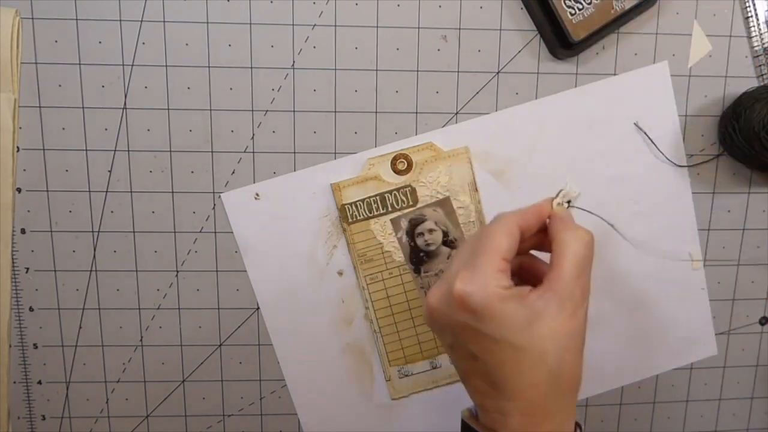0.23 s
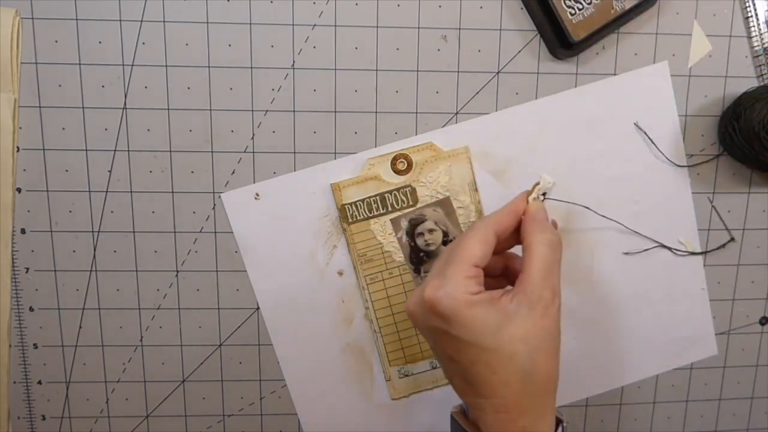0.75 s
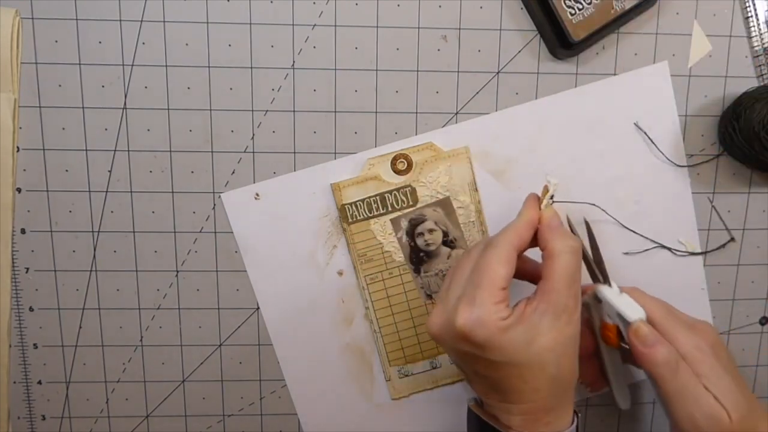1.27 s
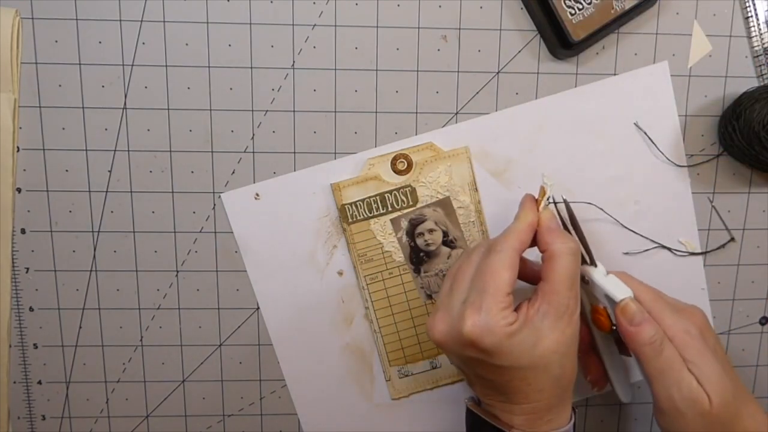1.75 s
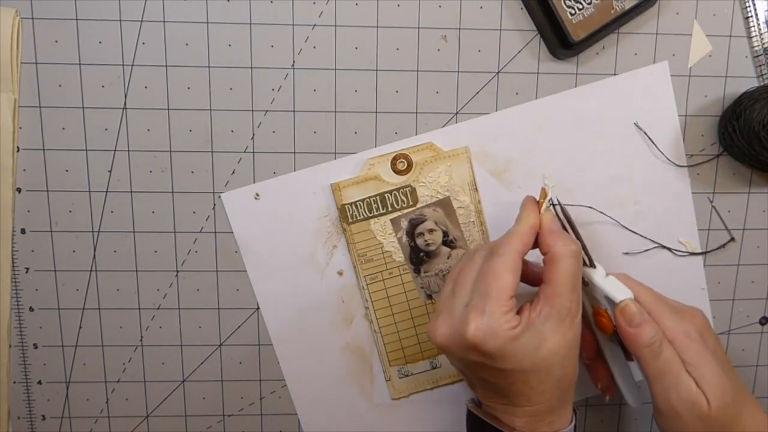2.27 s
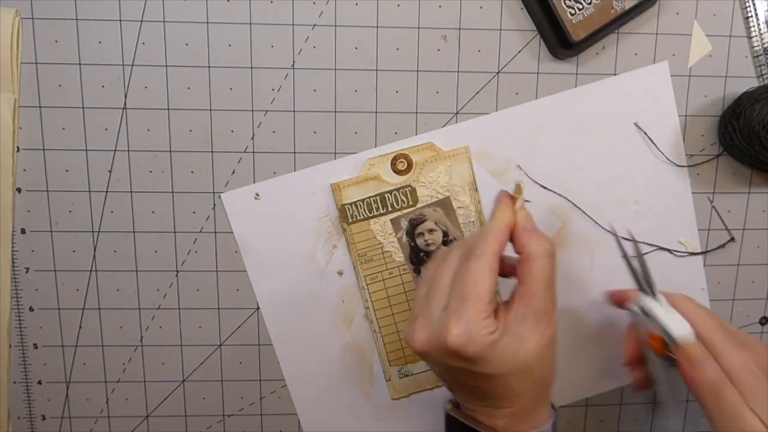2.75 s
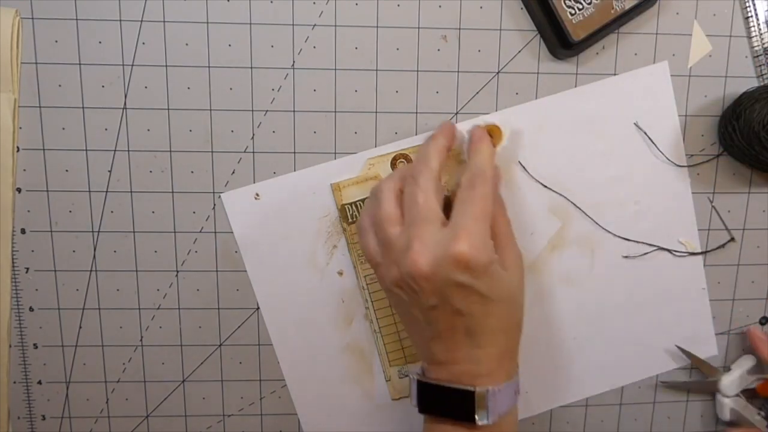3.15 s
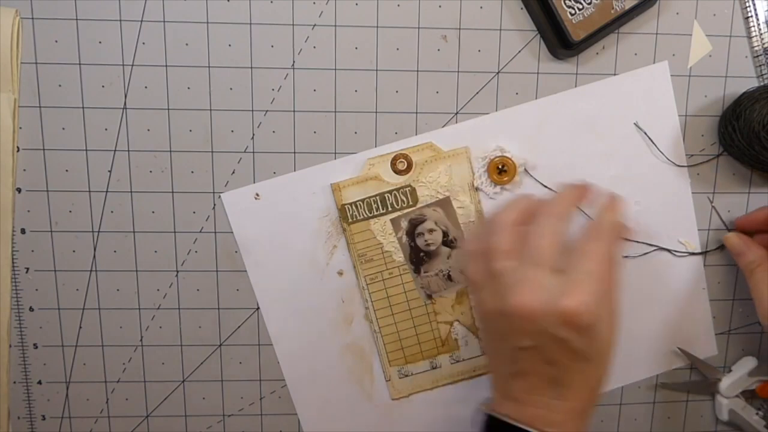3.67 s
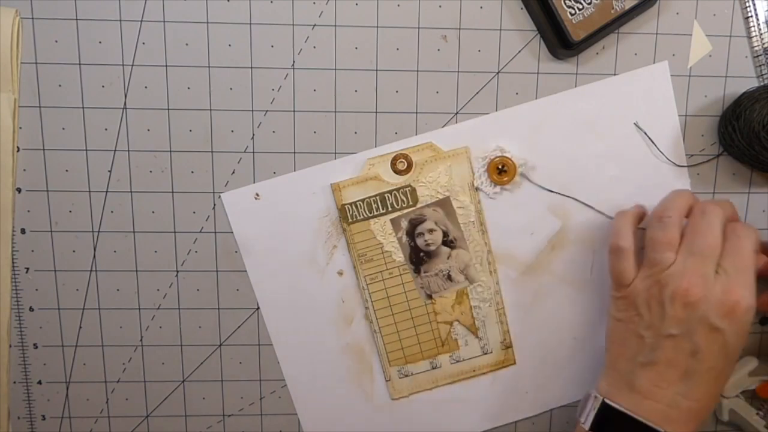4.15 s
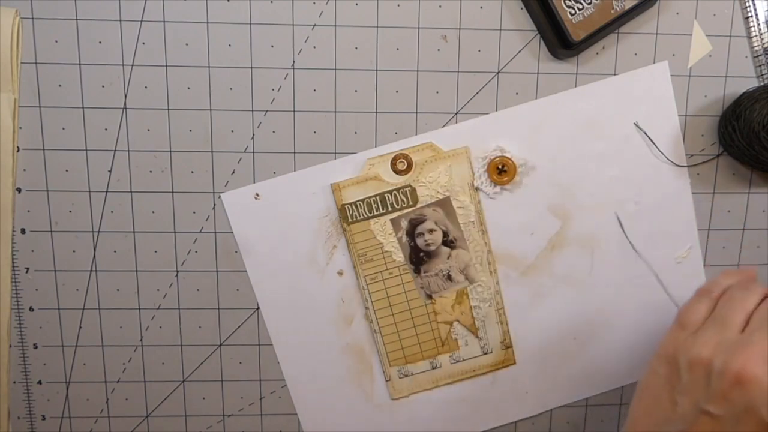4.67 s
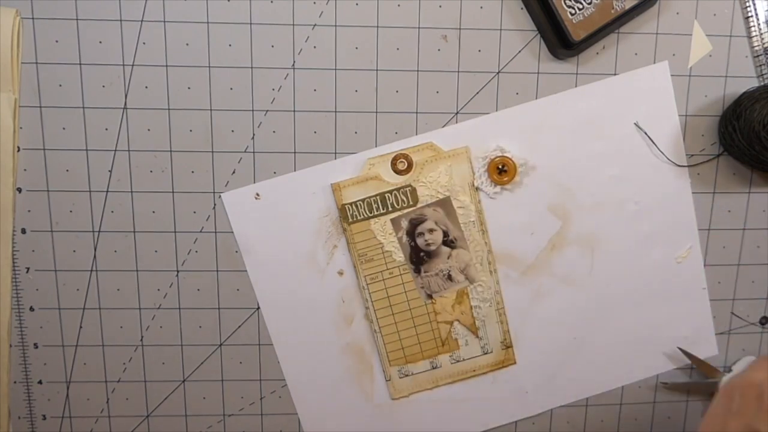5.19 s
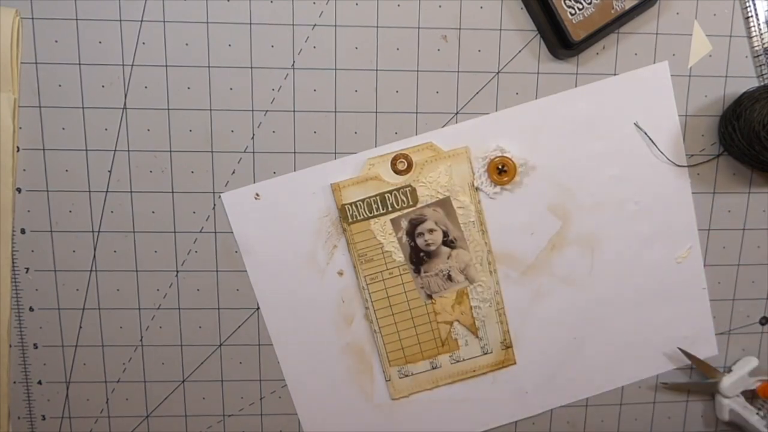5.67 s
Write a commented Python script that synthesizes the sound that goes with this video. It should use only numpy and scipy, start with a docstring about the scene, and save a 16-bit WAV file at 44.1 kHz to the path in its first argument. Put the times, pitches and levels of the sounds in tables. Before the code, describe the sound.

Small plastic-handled scissors are dragged and picked up from a mat with thin metallic ticks and a short rasp. After a quiet pause they cut thread with one brief bright snip, then land with a sharp, woody clack and quick bounce, the loudest moment. Faint taps and tiny fingertip rustles come after. Close microphones, small dry room, low distant fan rush and hum throughout.

```python
"""Small spring scissors at a craft table in a quiet room, heard by two microphone ports above the mat.
Fingers brush and squeak; the scissors are dragged and lifted off the mat, snip a thread, drop back with a clack
and a bounce, and are nudged again. Impacts excite damped modes of blades, plastic handles and table top, with
filtered noise for rattle; drags excite modes by random slips, and the snip by a short burst of noise.
A fan rushes and hums far off throughout, with microphone hiss: shaped noise and wavering sine tones."""
import sys
import numpy as np
from scipy import signal
from scipy.fft import rfft, irfft, next_fast_len
from scipy.io import wavfile
from scipy.ndimage import map_coordinates

SR = 44100
rng = np.random.default_rng(int(sys.argv[2]) if len(sys.argv) > 2 else 0)


def unload_audio(sound):
    """Save the sound as a 16-bit wav file, at the path given as the first command line argument."""
    columns = np.transpose(np.atleast_2d(sound))
    # keep every value between -1 and 1, then stretch to whole-number steps
    steps = np.round(np.clip(columns, -1, 1) * 32767)
    wavfile.write(sys.argv[1], SR, steps.astype(np.int16))


N = 261513  # length [samples]
TRAVEL_S = .0008  # from the mat up to the ports

# normal modes of the table top: (frequency [Hz], relative level [dB], undamped t60 [s])
TABLE = [(147, -2, 0.25), (259.6, -4, 0.24), (289, -7.5, 0.11), (343.4, -7.5, 0.2), (376, -12.5, 0.12),
         (470, -0.5, 0.074), (537.5, 1, 0.07), (669, -3.5, 0.06)]
# normal modes of the plastic handles: (frequency [Hz], relative level [dB], undamped t60 [s])
HANDLE = [(746, 3, 0.019), (980, 2, 0.012), (1245, -11.5, 0.08), (1300, -13.5, 0.06), (1360, -10.5, 0.06),
          (1450, 1.5, 0.0095), (1886, -4.5, 0.023), (2070, -4, 0.0076), (2776, -5, 0.0077),
          (3270, -0.5, 0.012), (3880, -2, 0.011), (4200, -5, 0.014), (4780, -6.5, 0.0063),
          (5900, -9, 0.005)]
# normal modes of the open blades: (frequency [Hz], relative level [dB], undamped t60 [s])
BLADES = [(7083, -4, 0.0069), (7430, 5, 0.0068), (8200, 1, 0.0051), (8874, 6.5, 0.0027), (9620, 9, 0.0045),
          (10020, 12.5, 0.0045), (10600, -1.5, 0.01), (11300, 0, .005), (12200, -11.5, 0.0055)]


def amp(db):
    """Level law: the amplitude gain of a level in dB."""
    return 10 ** (np.asarray(db) / 20)


def unit(x):
    """Power normalization: a signal scaled to rms 1."""
    return x / np.sqrt(np.mean(x ** 2) + 1e-20)


def along(points, hz):
    """Interpolation of (Hz, value) points along a logarithmic frequency axis."""
    f, v = np.transpose(points)
    return np.interp(np.log(hz + 1), np.log(f + 1), v)


def wobble(rate):
    """Slow random modulation: a smooth curve through random knots, rate of them a second."""
    knots = rng.standard_normal(int(N * rate / SR) + 4)
    return map_coordinates(knots, [np.arange(N) * rate / SR])


def filtered(x, response):
    """Linear filtering: the spectrum of x is multiplied by a response of frequency."""
    m = next_fast_len(N + 8192)
    return irfft(rfft(x, m) * response(np.fft.rfftfreq(m, 1 / SR)), m)[..., :N]


def passed(x, low_hz, high_hz, order):
    """Causal band-pass of Butterworth form."""
    band = [low_hz, min(high_hz, SR / 2.1)]
    return signal.sosfilt(signal.butter(order, band, "band", fs=SR, output="sos"), x)


def swells(s, db, rise, fall):
    """Exponential growth and decay: gains peaking at s seconds, with slopes in dB a second."""
    late = np.arange(N) / SR - np.asarray(s)[:, None]
    level_db = np.asarray(db)[:, None] - np.maximum(-rise * late, fall * late)
    return amp(np.max(level_db, axis=0))  # the strongest swell rules


def ring(modes, rise, scatter_db, spot_hz=1000, lean_db=0):
    """Modal impulse response, peak 1: modes lose lean_db an octave away from spot_hz."""
    hz, db, t60 = np.transpose(modes)[:, :, None]
    t = np.arange(round(t60.max() * SR)) / SR
    db = db - lean_db * np.abs(np.log2(hz / spot_hz)) + scatter_db * rng.standard_normal(hz.shape)
    tones = amp(db - 60 * t / t60) * np.sin(2 * np.pi * hz * t)
    x = np.sum(tones, axis=0) * (1 - np.exp(-t / rise)) ** 2
    return x / np.abs(x).max()


def rubbed(modes, rate, damping, spot_hz=1000, lean_db=0):
    """Friction as random slips of uneven size, rate a second, that keep damped modes sounding; rms 1."""
    slips = (rng.random(N) < rate / SR) * rng.standard_normal(N)
    held = [(hz, db, t60 * damping) for hz, db, t60 in modes]
    answer = ring(held, 0.00052, scatter_db=2.0, spot_hz=spot_hz, lean_db=lean_db)
    return unit(signal.fftconvolve(slips, answer)[:N])


def add(out, s, x, pan_db):
    """Superposition of a short sound at s seconds; pan_db is left minus right."""
    out[:, round(s * SR):][:, :len(x)] += x * amp([[pan_db / 2], [-pan_db / 2]])


def contacts():
    """Impact excitation: each knock cracks, rings the modes of blades and handles, and rattles both."""
    # knocks of the scissors: (time at the mat [s], handle knock level [dB], blade tick level [dB],
    # handle spot [Hz], spread [octaves], left minus right [dB])
    knocks = [ (0.3786, -37, -34, 1500, 0.69, -8), (0.385, -34, -36.5, 1570, 0.78, 3),
              (0.391, -37, -41, 2250, 1.75, -3), (0.4, -47, -45.5, 1270, 0.096, 14),
              (0.441, -47, -53, 2860, 0.22, -2), (0.467, -58, -50, 2860, .4, -1),
              (.478, -56, -48, 2860, .4, -0.5), (.502, -44, -50, 4200, 0.18, -13),
              (0.525, -29.5, -31, 3470, 1.54, -3.5), (0.5639, -52, -45, 2500, 1.4, 1),
              (0.632, -59, -77, 1900, 0.64, -1.5), (0.649, -45, -75, 1900, 0.44, -1.5),
              (0.747, -39, -35.5, 4220, 1.1, -3.5), (0.787, -41, -55, 4450, 0.22, -1),
              (.795, -47.5, -61, 4700, 0.26, -1), (0.816, -52, -70, 1500, 0.52, -3),
              (3.163, -39.5, -40, 1730, 0.85, -1.5), (3.2109, -30.5, -56, 1670, 1.5, -4),
              (3.2252, -12, -11, 2950, 0.96, -4), (3.2263, -8.5, -23.5, 970, 0.88, 2),
              (3.2333, -34.5, -32.5, 2200, 1, -1.5), (3.243, -31, -48.5, 1600, 0.86, 6),
              (3.2493, -34.5, -46, 3000, 0.82, 1.5), (3.301, -28.5, -35, 1998, 1.4, -3.5),
              (3.3029, -21.5, -42, 930, 0.97, 3), (3.569, -47, -60, 4000, 0.26, -2.5),
              (3.814, -47, -66, 1116, 0.54, -2.5), (3.9826, -46.5, -58, 1800, 1.18, -1),
              (4.009, -44.5, -67, 1100, 0.3, 3), (4.016, -43, -68, 1240, 0.11, -1),
              (4.019, -50.5, -66, 2800, 0.71, 0.5)]
    detune, scatter_db = .015, 1.5  # each handle mode is detuned at random, a little, from blow to blow
    rattle_t60_s, rattle_shortens = 0.063, 0.23  # after a -40 dB knock; dB shorter for each dB harder
    ring_most_s, ring_shortens = .1, .3  # longest handle ring, pressed to the mat, on the same rule
    rattle_db, rattle_lags = 0.6, .15  # rattle over a -40.5 dB knock; dB less for each dB harder
    crack_db, crack_grows = -0.5, 0.067  # crack over a -28 dB tick; dB more for each dB harder
    crack_late_s = .0003
    out, t = np.zeros((2, N)), np.arange(SR // 10) / SR
    for s, knock_db, tick_db, handle_hz, spread, pan_db in knocks:
        s = s + TRAVEL_S
        harder_db = knock_db + 40

        # the dry snap of metal on the mat
        crack = passed(1. * (t == 0), 7000, 10600, order=3)
        crack_level_db = tick_db + crack_db + crack_grows * (tick_db + 28)
        add(out, s + crack_late_s, amp(crack_level_db) * crack / crack.max(), pan_db)

        noise = rng.standard_normal((2, len(t)))
        t60 = rattle_t60_s * amp(-rattle_shortens * harder_db)
        jingle = amp(-60 * t / (0.34 * t60)) * noise[0]  # the light blades settle sooner
        add(out, s, amp(tick_db) * ring(BLADES, .00025, scatter_db), pan_db)
        add(out, s, amp(tick_db - 0.5) * passed(jingle, 7400, 12600, order=3), pan_db)

        detuned = np.array(HANDLE)
        detuned[:, 0] *= 1 + detune * rng.standard_normal(len(HANDLE))
        detuned[:, 2] = np.minimum(detuned[:, 2], ring_most_s * amp(-ring_shortens * harder_db))
        handle = ring(detuned, 0.00016, scatter_db, handle_hz, lean_db=9 / spread)
        add(out, s, amp(knock_db) * handle, pan_db)

        # a wide knock is more rattle than ring
        rattle = amp(-60 * t / t60) * noise[1] / np.sqrt(handle_hz / 2000)
        rattle = passed(rattle, handle_hz / np.exp2(spread), handle_hz * np.exp2(spread), order=2)
        rattle_level_db = knock_db + rattle_db - rattle_lags * (knock_db + 40.5)
        add(out, s, amp(rattle_level_db) * rattle, pan_db)
    return out


def thuds():
    """Compliant impact: the mat gives once and passes a soft push to the modes of the table top."""
    # weight landing on the table top: (time at the mat [s], thud level [dB], table spot [Hz])
    landings = [ (0.378, -50, 348), (0.443, -52, 343), (0.509, -45, 514), (0.518, -40.5, 500),
                (0.5253, -44.5, 614), (0.65, -45.5, 256), (0.7951, -43, 442), (0.8, -52, 150),
                (.82, -37.5, 457), (3.164, -30, 294), (3.2115, -18, 313), (3.2244, -20.5, 476),
                (3.265, -27, 320), (3.276, -24.5, 262), (3.301, -28.5, 317), (3.3119, -26, 294),
                (3.815, -55, 400), (3.981, -43.5, 272), (3.992, -49, 258), (4.012, -56, 264),
                (4.025, -47.5, 282)]
    ring_db, ring_grows = -7.5, 0.16  # ring over a -24.5 dB thud; dB more for each dB harder
    out, t = np.zeros((2, N)), np.arange(SR // 10) / SR
    give = (t / .004 * np.exp(1 - t / .004)) ** 3
    for s, db, table_hz in landings:
        push = give * np.sin(2 * np.pi * table_hz * t)
        add(out, s + TRAVEL_S, amp(db) * push, pan_db=2.0)
        table = ring(TABLE, 0.0051, 3.8, table_hz, lean_db=10.5)
        add(out, s + TRAVEL_S, amp(db + ring_db + ring_grows * (db + 24.5)) * table, pan_db=1.5)
    return out


def snip():
    """Noise excitation: a short burst swells, then dies away, exciting the closed, damped blades."""
    # blades shearing the thread: (time [s], blade peak level [dB], build-up [s], left minus right [dB])
    shears = [(2.598, -30, 0.0031, -1.5)]
    # normal modes of the closed blades: (frequency [Hz], relative level [dB], t60 [s])
    shut_blades = [(6400, -10.5, 0.005), (6600, -7, 0.003), (8730, -1, .004), (8700, -1, .003),
                   (10180, -15, 0.003), (11080, 3.5, 0.0042), (11710, -5, 0.0051), (12650, -3, .004),
                   (14300, -4, .004)]
    out, t = np.zeros((2, N)), np.arange(-SR // 50, SR // 25) / SR
    for s, db, build, pan_db in shears:
        swell = np.exp(np.minimum(t / build, -t / 0.0029))
        slow_end = 0.17 * (t > 0) * np.exp(-t / 0.0087)
        burst = rng.standard_normal((2, len(t))) * (swell + slow_end)
        stirred = signal.fftconvolve(burst[0], ring(shut_blades, .0001, 0))
        treble = passed(burst[1], 9900, 13000, order=2)
        jolt = passed(burst[0], 900, 4800, order=1)  # taken by the handles
        add(out, s + t[0], amp(db) * stirred / np.abs(stirred).max(), pan_db)
        add(out, s + t[0], amp(db - 13.5) * treble, pan_db)
        add(out, s + t[0], amp(db - 16.5) * jolt, pan_db)
    return out


def slides():
    """Sliding friction: many small slips shake table, handles and blades as the scissors are dragged."""
    # jerks along the mat: (time of the peak [s], weight on the table [dB], loose scratch [dB], pressed rasp [dB])
    jerks = [(0.445, -42, -64, -48.5), (0.454, -41.5, -65, -51), (0.476, -45, -54, -43.5),
             (0.487, -44, -57.5, -51), (0.502, -45, -62, -53.5), (0.649, -53, -64.5, -73),
             (0.795, -48, -58, -60.5), (3.996, -62, -61, -70), (4.014, -59, -55, -59)]
    # modes of the handle pressed on the mat: (frequency [Hz], relative level [dB], undamped t60 [s])
    pressed_handle = [(2860, 7, 0.023), (4140, 2, 0.013), (2610, -7, 0.022)]
    rise, rasp_fall, drag_fall = 1080, 530, 270  # dB a second; rasp stops sooner than rumble and scratch
    hiss_db = -3  # the blades, under the rasp
    s, weight_db, scratch_db, rasp_db = np.transpose(jerks)
    rumble = swells(s, weight_db, rise, drag_fall)
    scratch = swells(s, scratch_db, rise, drag_fall)
    rasp = swells(s, rasp_db, rise, rasp_fall)
    near = rasp * rubbed(pressed_handle, 2500, damping=0.78)
    near += scratch * rubbed(HANDLE[1:], 900, damping=0.19, spot_hz=4000, lean_db=0.5)
    near += amp(hiss_db) * rasp * rubbed(BLADES, 3000, damping=0.19)
    # short, broad table and handle modes give a dull rumble
    drag = rubbed(TABLE[3:] + HANDLE[:2], 2500, damping=.15, spot_hz=750, lean_db=4)
    return near * amp([[-1.5], [1.5]]) + rumble * passed(drag, 315, 3800, order=3)


def fingers():
    """Fine friction: crackle as fingertips brush thread and paper, and short squeaks of unsteady phase."""
    # brushes: (time of the peak [s], level [dB])
    brushes = [(.098, -70.5), (.216, -71), (2.8, -71), (2.868, -72.5), (3.108, -65.5), (3.448, -67.5),
               (4.186, -69), (4.318, -72)]
    # faint thin squeaks: (time [s], length [s], starting pitch [Hz], level [dB])
    squeaks = [(0.087, 0.02, 4366, -68), (4.233, 0.013, 4028, -62.5), (4.244, 0.049, 4014, -65)]
    touch = swells(*np.transpose(brushes), rise=330, fall=140)  # dB a second
    crackle = rubbed(HANDLE[-4:] + BLADES, 1700, damping=0.12, spot_hz=9040, lean_db=4)
    out = touch * crackle * np.ones((2, 1))
    for s, length, hz, db in squeaks:
        t = np.arange(round(length * SR)) / SR
        drift = np.cumsum(0.3 * rng.standard_normal(len(t)))
        phase = 2 * np.pi * hz * (t + 0.73 * t * t) + drift  # the pitch climbs
        add(out, s, amp(db) * np.hanning(len(t)) * np.sin(phase), pan_db=-4.5)
    return out


def room(x):
    """Reverberation: each band of a noise tail decays at its own rate; the close ports hear bass alike."""
    # reverberation time of the room: (frequency [Hz], t60 [s])
    decay_times = [(500, 0.18), (1500, 0.17), (4000, 0.17), (10000, 0.11)]
    hz, t, z = signal.stft(rng.standard_normal((2, SR // 2)), SR, nperseg=128)
    z = z * amp(-60 * t / along(decay_times, hz)[:, None])
    apart = np.clip(hz / 1200, 0, .8)[:, None]
    tail = signal.istft(np.array([z[0] + apart * z[1], z[0] - apart * z[1]]), SR, nperseg=128)[1]
    delayed = np.pad(x, ((0, 0), (80, 0)))  # samples
    return signal.fftconvolve(delayed, tail / np.linalg.norm(tail[0]), axes=1)[:, :N]


def fan():
    """Partly coherent noise, the fan's steady rush together with microphone hiss, and wavering motor tones."""
    # spectrum of rush and hiss: (frequency [Hz], relative level per Hz [dB])
    rush_spectrum = [(15, -53.5), (30, -26.5), (80, -23), (150, -11.5), (300, -8.5), (600, -7), (790, -7.5),
                     (860, -13), (1500, -14.5), (2100, -21.5), (2500, -24.5), (4500, -26), (5700, -31),
                     (10000, -29), (15400, -38)]
    # coherence of rush and hiss: (frequency [Hz], left-right correlation [-1 to 1])
    likeness = [(60, 0.26), (130, 0.69), (290, 0.57), (640, 0.23), (1410, -0.53), (3100, 0.14),
                (6820, 0.26), (15000, 0.4)]
    # motor tones: (frequency [Hz], relative level [dB])
    motor_tones = [(599.5, 0), (337.5, -10)]
    rush_db, hum_db = -58.5, -61.5
    hum_fades, hum_from_s = 1.5, 0.9  # dB a second lost from this time on

    def mid_and_side(hz):
        turn = np.arccos(np.clip(along(likeness, hz), -1, 1)) / 2
        return amp(along(rush_spectrum, hz)) * [np.cos(turn), np.sin(turn)]

    t = np.arange(N) / SR
    mid, side = filtered(rng.standard_normal((2, N)), mid_and_side)
    rush = amp(rush_db + .4 * wobble(7)) * unit(np.array([mid + side, mid - side]))
    hum = np.zeros(N)
    for hz, db in motor_tones:
        hum += amp(db + .8 * wobble(6)) * np.sin(2 * np.pi * hz * t + .4 * wobble(8))
    hum_level_db = hum_db - hum_fades * np.maximum(t - hum_from_s, 0)
    return rush + amp(hum_level_db) * hum * amp([[.6], [-.6]])


def scene():
    """Direct plus reverberant sound, thinned by the small ports, over the fan."""
    near = contacts() + thuds() + snip() + slides() + fingers()
    walls = amp(-4.5) * room(passed(near, 563, 9000, order=1))  # the tail is made from sound above about 560 Hz
    return passed(near + walls, 108, 11800, order=4) + fan()


def record(dry):
    """Band limiting: nothing at or above 15500 Hz is kept."""
    return filtered(dry, lambda hz: hz < 15500)


dry = scene()
out = record(dry)
unload_audio(out)
```